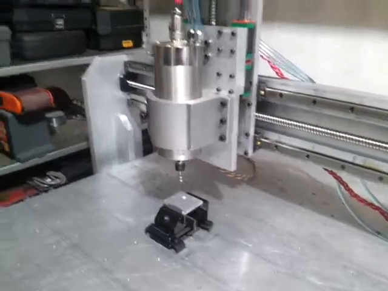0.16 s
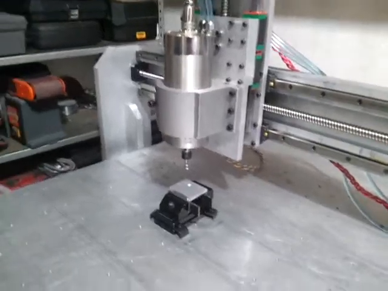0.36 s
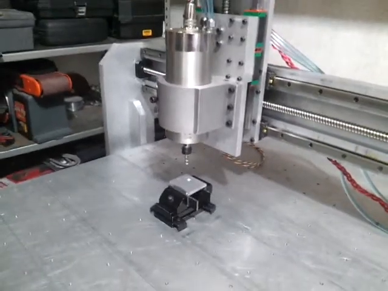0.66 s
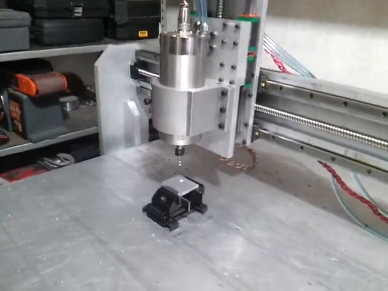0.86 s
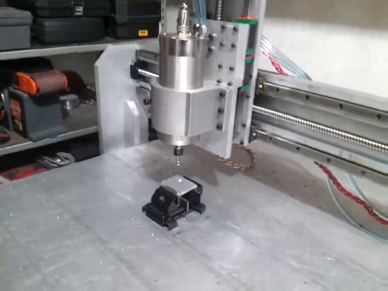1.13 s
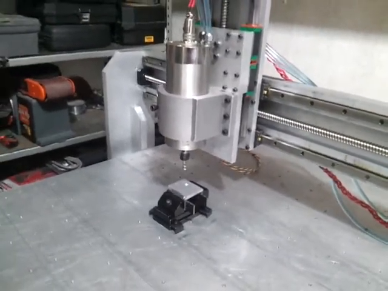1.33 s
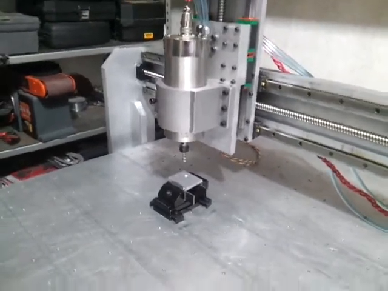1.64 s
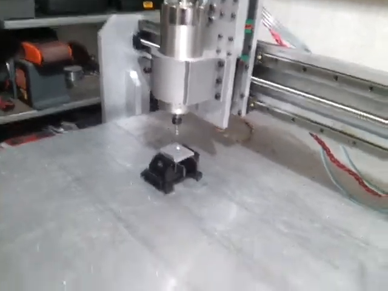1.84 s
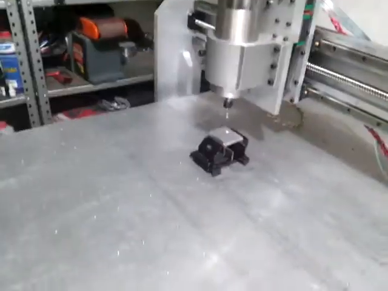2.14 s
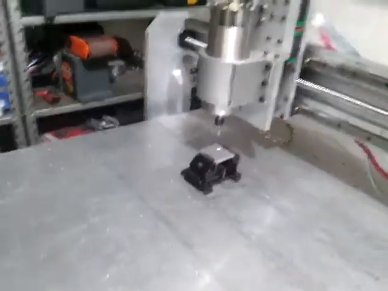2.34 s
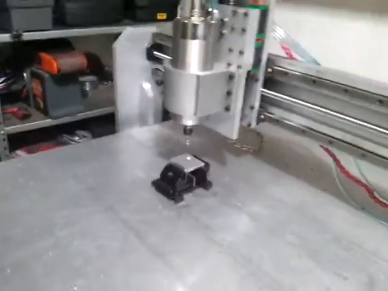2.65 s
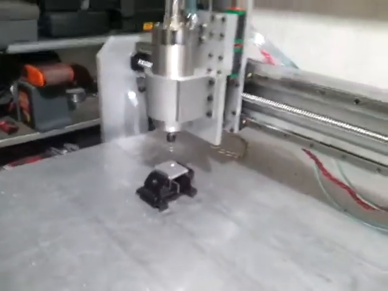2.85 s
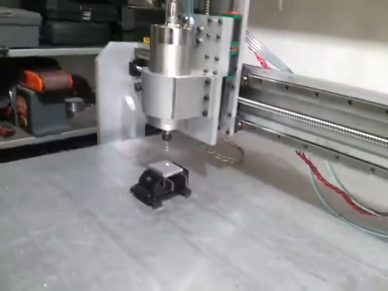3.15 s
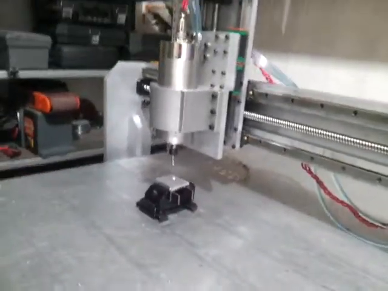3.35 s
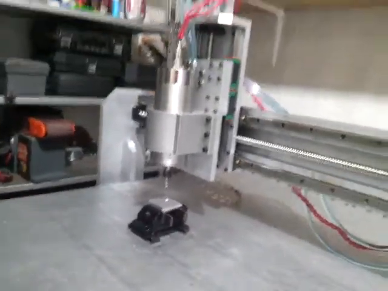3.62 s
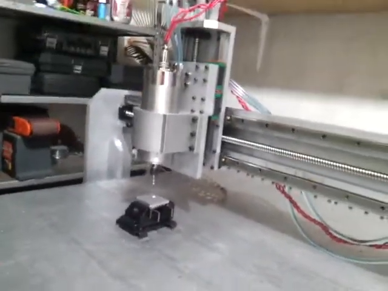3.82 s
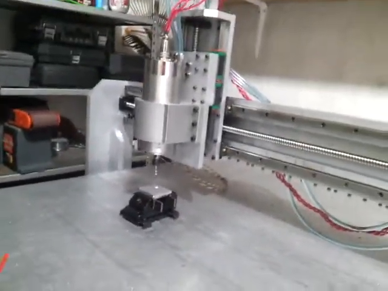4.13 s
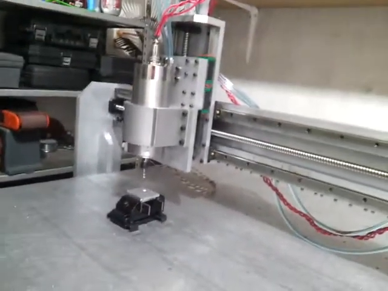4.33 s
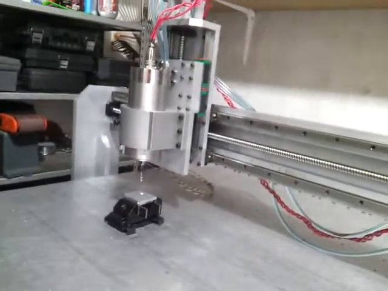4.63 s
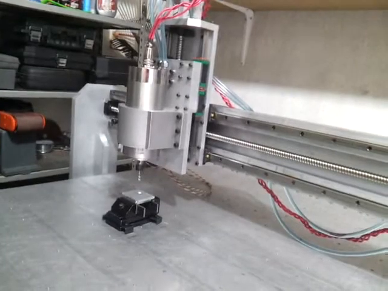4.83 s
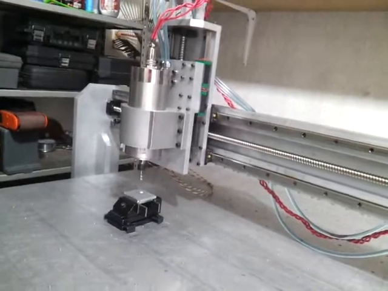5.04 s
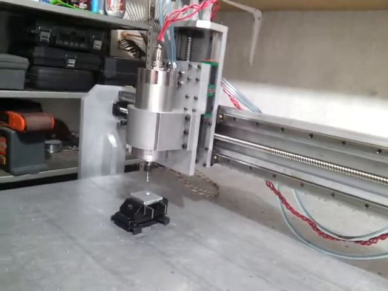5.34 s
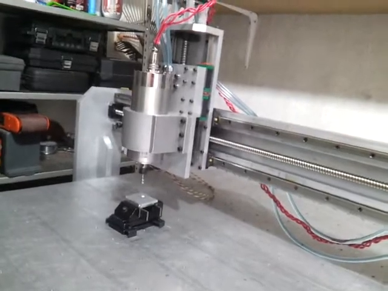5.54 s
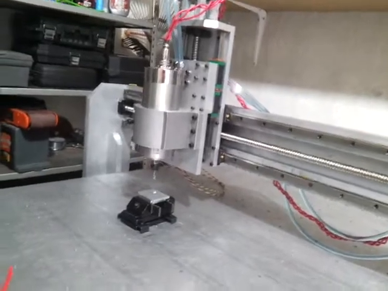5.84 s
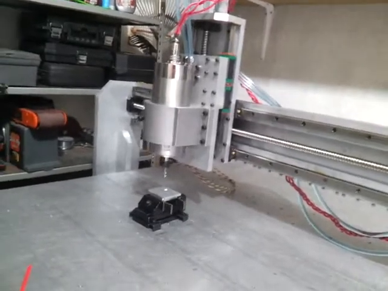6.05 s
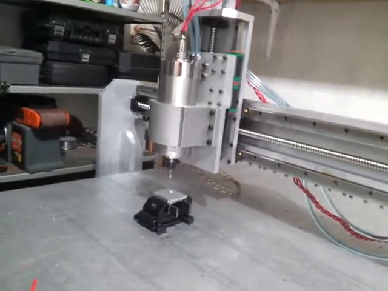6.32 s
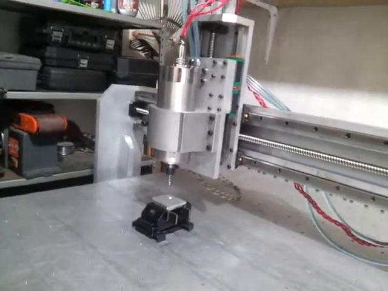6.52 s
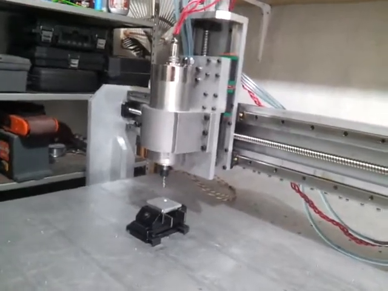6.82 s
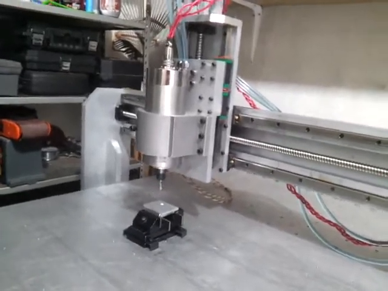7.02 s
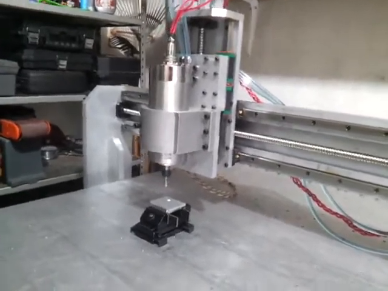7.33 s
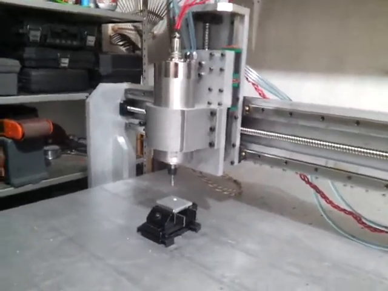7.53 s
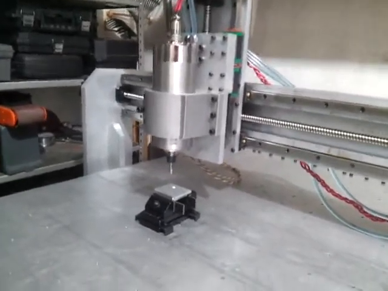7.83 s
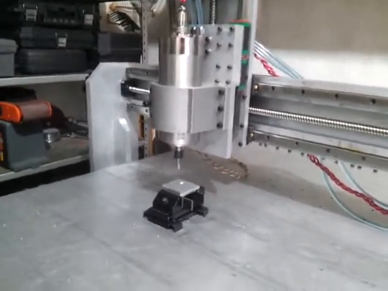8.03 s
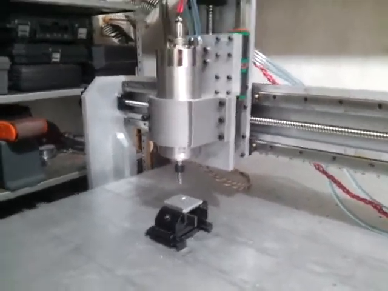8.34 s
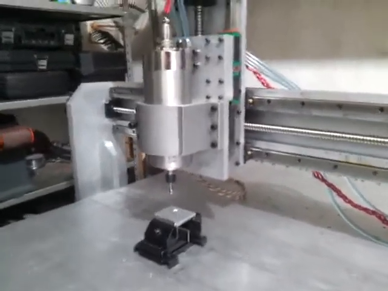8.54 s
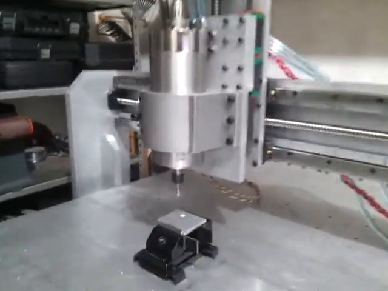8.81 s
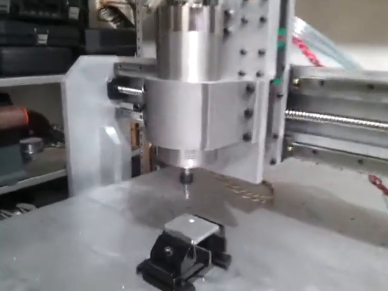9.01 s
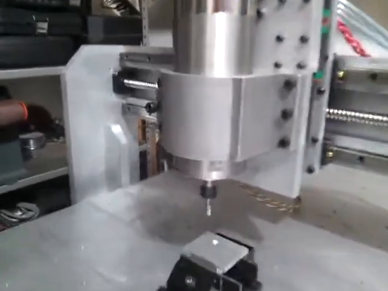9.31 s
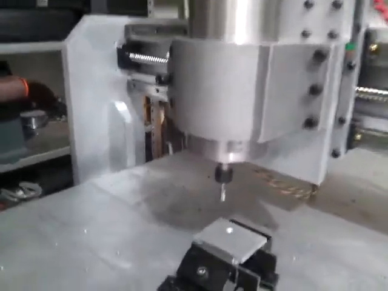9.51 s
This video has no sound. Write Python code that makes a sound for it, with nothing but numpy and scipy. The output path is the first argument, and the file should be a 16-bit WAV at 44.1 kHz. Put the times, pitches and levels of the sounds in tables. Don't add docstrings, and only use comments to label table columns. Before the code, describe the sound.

The sound fades in quickly on a small workshop pump, a steady buzzing drone rich in low and middle harmonics, under broad fan rush and leaking air. Soft handling rumble comes and goes. Near 1.9-2.1 s two small knocks accompany a nozzle opening, and bright hiss swells and stays; a light double tick falls at 3.3 s. At about 5.55 s a rapid cluster of sharp relay clicks starts a router spindle: a faint whine near 5.3 kHz, replaced at 5.9 s by a piercing tone near 8 kHz with a weaker one around 4 kHz, their flutter quickening as it accelerates. An air puff comes at 6.7 s. At 8.2 s the microphone swings away with a small knock; hiss and whine dull. Approaching until the end near 9.7 s, it catches a wavering whine, dull knocks at 9.1 and 9.5 s, handling rumble and a growing rough metallic whirr.

```python
import sys
import numpy as np
from scipy import signal
from scipy.fft import rfft, irfft, next_fast_len
from scipy.io import wavfile
from scipy.ndimage import uniform_filter1d, map_coordinates

SR = 44100
rng = np.random.default_rng(int(sys.argv[2]) if len(sys.argv) > 2 else 0)


def file_out(sig):
    cols = np.atleast_2d(sig).T
    lim = np.clip(cols, -1, 1)
    pcm = np.round(lim * 32767).astype(np.int16)
    wavfile.write(sys.argv[1], SR, pcm)


def natural_amplitude(level_db):
    exponent = np.asarray(level_db, float) / 20
    return 10 ** exponent


N = 426447

PUMP_HZ, SWITCHING_HZ = 34.667, 7996.5
STROKE_TURN = .016
OPEN_S, OPEN_TAKES_S = 1.96, .1
TURN_S, TURN_TAKES_S = 8.19, .1
SWITCH_S = 5.922
ON = slice(round(5.5 * SR), N)
ON_S = np.arange(N)[ON] / SR

# frequency in Hz, density in dB per Hz.
RUMBLE_SPECTRUM = [(8.8, -43), (15, -7), (76, -4), (108, 2), (130, -3), (170, -37), (290, -120)]
# centre in seconds, width in seconds, gain in dB.
RUMBLE_SWELLS = [(.9, 0.52, 6), (1.7, .4, 8), (3.7, 0.22, 3), (4.9, .3, 2), (6.4, .2, 7), (7.25, .25, -12),
                 (8.6, .4, 8), (9.1, .15, 8), (9.6, 0.27, 10)]
# frequency in Hz, density in dB per Hz.
BODY_SPECTRUM = [(65, -48), (110, -15), (158, -12), (199, -10.5), (309, -6), (356, -11.5), (389, -4),
                 (460, -10.5), (612, -7.5), (924, -13), (1490, -16), (2000, -14.5), (2400, -33.5),
                 (3120, -53), (5280, -120)]
# frequency in Hz, density in dB per Hz.
DUCT_SPECTRUM = [(1800, -50), (1930, -12), (1985, 3), (2040, -13), (2180, -25)]
# frequency in Hz, density in dB per Hz.
FAN_SPECTRUM = [(1410, -14), (2400, 0.5), (2720, 1), (3410, -2.5), (4080, -4), (5250, -4.5), (7160, -1.5),
                (8930, -3), (10000, -8.5), (13000, -56), (22000, -120)]
# frequency in Hz, density in dB per Hz.
NOZZLE_SPECTRUM = [(1760, -13.5), (3000, -14), (3350, -8.5), (4470, -6), (5200, -3.5), (6120, -4),
                   (6550, 0), (7710, 2), (8210, -1.5), (9910, -17.5), (10500, -47), (13600, -43),
                   (22000, -120)]
# frequency in Hz, density in dB per Hz.
FIZZ_SPECTRUM = [(5590, -40), (9500, -7.5), (11200, 8), (11800, 6), (12000, -31), (12200, -14),
                 (12400, -75), (16100, -105), (22000, -120)]
# centre in seconds, width in seconds, gain of fan, nozzle and fizz in dB.
PUFFS = [(.5, 0.9, -0.5, -0.5, 1), (.8, .5, -1.5, 1.5, -2), (1.8, 0.3, 1.5, -4.5, -2.5),
         (2.25, 0.15, 1, -2, 2.5), (2.92, .14, 1, 0, 2.5), (3.53, 0.11, 0.5, 0, 3.5), (5.57, .03, 2, 3, 0),
         (6.68, 0.044, 5, 3, 0), (7.5, 0.38, 1, 1, 3), (8.16, .03, -1, 5, -2), (8.25, 0.058, 4, -7, 0),
         (8.47, 0.1, 1.5, -1, 4.5), (9.67, 0.27, -4, 3, 1.5)]
# fan, nozzle in dB.
AIR_SHADE_DB = (-6, -3)
# multiple of the shaft speed, level in dB.
PUMP_ORDERS = [(1, -30), (2, -27), (3, -32.5), (4, -17), (5, -12), (6, -31), (7, -5.5), (8, -17), (9, -0.5),
               (10, -13.5), (11, -7), (12, -16.5), (13, -21), (14, -18), (15, -20.5), (16, -10.5),
               (17, -7.5), (18, -4), (19, -53), (20, -10), (21, -10.5), (22, -21.5), (23, -13.5), (24, -11),
               (25, -25.5)]
# frequency in Hz, level in dB.
RATTLE_LEVELS = [(880, -56), (1200, -52), (1500, -57), (2000, -56.5), (2600, -62.5), (3300, -57.5),
                 (4200, -64.5), (5200, -64)]
# time in seconds, place in m, share of the pump heard directly from 0 to 1.
WALK = [(0, 0.034, 0.12), (3, 0.15, 0.11), (6, 0.41, 0), (7.2, 0.61, 0.24), (7.8, 0.69, 0.34),
        (8.4, 0.72, 0.4), (8.9, 0.85, 0.45), (9.25, 1, 0.3), (9.67, 0.95, 0.03)]
STANDING = [
    (0.28, 1.33, 0.63),
    (0.84, 1.044, 0.3),
    (0.42, 1.14, 0.52),
    (0.78, 1.8, 0.25),
    (-0.13, 1.33, 0.33),
]
# start in seconds, level in dB, pitch in Hz, decay by 60 dB in seconds.
TICKS = [(1.914, -27, 1900, .04), (2.045, -24.5, 1200, 0.04), (3.305, -26, 4670, .03),
         (3.319, -27, 2190, 0.026), (5.547, -25, 7600, 0.016), (5.553, -21, 8400, .03),
         (5.557, -23, 7360, 0.033), (5.561, -24, 7870, .03), (5.566, -27, 8750, .03),
         (5.573, -23, 7740, 0.066), (5.59, -28, 7600, .03), (6.678, -35, 3050, 0.037),
         (8.177, -27, 3000, .04), (9.125, -31, 398, .2), (9.53, -28.5, 397, 0.24)]
# time in seconds, field speed in Hz.
FIELD_SPEED = [(5.6, 2.5), (6.2, 11.65), (6.9, 22.65), (7.1, 25.4), (7.4, 29.15), (7.8, 33.05), (8.2, 36.1),
               (8.7, 39.1), (9.7, 44.45)]
# time in seconds, speed towards the spindle in m per s.
CLOSING = [(6.7, 0), (7.05, -.04), (7.5, 0), (8.15, 0), (8.65, .23), (8.9, .25), (9.3, .13), (9.7, .08)]
# full level in dB, growth with voltage in dB per dB, shade after the swing in dB.
WHINE = [
    (-14.5, 0.44, -10.5),
    (-22.5, 0.18, -3.5),
    (-28, 0.94, -11),
    (-26, 0.96, -5),
]
# centre in seconds, width in seconds, lower and upper in dB.
NULLS = [(6.2, .12, 0.5, -1.5), (6.7, 0.12, -1.5, 2.5), (6.9, .07, -1, 0), (7.4, 0.26, 2, -1),
         (7.47, .08, 0, -8), (7.72, .12, 0.5, 1), (8.18, 0.073, -0.5, -10), (8.3, 0.071, -9, 4),
         (8.5, .12, 1, -9), (8.68, .07, 2, -4), (8.9, 0.065, -4, -4), (9.2, 0.19, -7, 0.5),
         (9.3, 0.038, -4, -2.5)]
# offsets in field orders, then levels in dB.
OUTER_ORDERS = [-10, -7, -4, -3, -2, -1.5, -.5, 0, .5, 2, 4, 8]
OUTER_DB = [-20, -12, -5, -19, -7, -15, -13, -10, -19, -3, -13, -25]
# offsets in field orders, then levels in dB.
HALF_ORDERS = [-9.5, -8.5, -6.5, -5.5, -4.5, -3.5, -2.5, -1.5, -1, -.5, .5, 1, 1.5, 2, 2.5, 3.5, 4, 4.5, 5,
               5.5, 6.5, 8, 9.5, 11]
HALF_DB = [-28, -28, -25, -16, -21, -22, -11, -11, -22, -4, -8, -13, -10, -16, -7, -21, -22, -21, -19, -18,
           -26, -24, -27, -28]
# time in seconds, level in dB.
START_LEVEL = [(5.57, -55), (5.605, -38), (5.71, -33), (5.75, -26.5), (5.9, -26.5)]
# centre in Hz, bandwidth in Hz, level in dB.
HOUSING = [
    (1298, 52, -2),
    (2567, 68, 3.5),
    (4710, 200, -7.5),
]
# centre in seconds, width in seconds, gain in dB.
CATCHES = [(8.67, .06, 3), (8.91, .04, 5), (9.24, 0.052, 4), (9.33, 0.027, 6), (9.41, .03, 3),
           (9.63, .05, 1.5)]


def unit(x):
    return x / np.sqrt(np.mean(x ** 2) + 1e-20)


def along(points, hz):
    f, v = np.transpose(points)
    return np.interp(np.log(hz + 1), np.log(f + 1), v)


def curves(rows):
    s, *cols = np.transpose(rows)
    return [np.interp(np.arange(N) / SR, s, c) for c in cols]


def ramp(start_s, takes_s):
    return np.clip((np.arange(N) / SR - start_s) / takes_s, 0, 1)


def bumps(rows):
    rows, t = np.array(rows), np.arange(0, N + 256, 256) / SR
    sums = rows[:, 2:].T @ np.exp(-((t - rows[:, :1]) / rows[:, 1:2]) ** 2)
    return [np.interp(np.arange(N) / SR, t, v) for v in sums]


def wobble(rate_hz, part=slice(None)):
    knots = rng.standard_normal(int(N * rate_hz / SR) + 4)
    coarse = map_coordinates(knots, [np.arange(0, N + 256, 256) * rate_hz / SR])
    return np.interp(np.arange(N)[part], np.arange(len(coarse)) * 256, coarse).astype(np.float32)


def filtered(x, response):
    m = next_fast_len(N + SR // 2)
    return irfft(rfft(x, m) * response(np.fft.rfftfreq(m, 1 / SR)), m)[:N]


def rush(spectrum, patchy_db):
    z = signal.stft(rng.standard_normal(N + 512), nperseg=512)[2]
    patches = uniform_filter1d(rng.standard_normal(z.shape), 6, 0)
    patches = uniform_filter1d(patches, 14, 1)
    noise = signal.istft(z * natural_amplitude(patchy_db * unit(patches)), nperseg=512)[1][:N]
    return unit(filtered(noise, lambda hz: natural_amplitude(along(spectrum, hz))))


def shaft_turns():
    n = np.arange(N)
    return PUMP_HZ * (n + 1024 * (n > 4.749 * SR)) / SR


def stroke_throb(depth):
    angle = 2 * np.pi * shaft_turns()
    return 1 + depth * (.5 * np.cos(2 * angle) + 1.1 * np.cos(4 * angle))


def handling():
    thumps = natural_amplitude(3.1 * wobble(11)) * rush(RUMBLE_SPECTRUM, patchy_db=2.0)
    return natural_amplitude(-60 + bumps(RUMBLE_SWELLS)[0]) * unit(thumps)


def pump_body_and_duct():
    unsteady_db = 0.59 * wobble(2.945)
    body = natural_amplitude(-34 + unsteady_db) * stroke_throb(0.056) * rush(BODY_SPECTRUM, patchy_db=1.0)
    duct_db = -51.5 + unsteady_db - 6.2 * ramp(TURN_S, TURN_TAKES_S) + 1.6 * wobble(0.61)
    return body + natural_amplitude(duct_db) * rush(DUCT_SPECTRUM, patchy_db=0.0)


def fan():
    level_db = -39 + bumps(PUFFS)[0] + 0.35 * wobble(3.7)
    level_db += 3 * ramp(OPEN_S, OPEN_TAKES_S) + 3 * ramp(6.2, 2.1)
    level_db += AIR_SHADE_DB[0] * ramp(TURN_S, TURN_TAKES_S)
    return natural_amplitude(level_db) * stroke_throb(0.091) * rush(FAN_SPECTRUM, patchy_db=0.4)


def nozzle():
    opened = ramp(OPEN_S, OPEN_TAKES_S)
    missing_db = -2 * np.exp(-np.maximum(np.arange(N) / SR - OPEN_S, 0) / 1.2)
    level_db = -31.5 + bumps(PUFFS)[1] + .5 * wobble(5)
    level_db += -10 * (1 - opened) + missing_db * opened
    level_db += AIR_SHADE_DB[1] * ramp(TURN_S, TURN_TAKES_S)
    return natural_amplitude(level_db) * rush(NOZZLE_SPECTRUM, patchy_db=1.3)


def fizz():
    level_db = -41 + bumps(PUFFS)[2] - 3.5 * ramp(3, 1.4) + 1.2 * wobble(5)
    return natural_amplitude(level_db) * rush(FIZZ_SPECTRUM, patchy_db=1.4)


def pump_orders(angle):
    place_m, direct = curves(WALK)
    best_m, repeat_m, echo = np.transpose(STANDING)[:, :, None]
    standing_wave = np.exp(2j * np.pi * (place_m[::256] - best_m) / repeat_m)
    levels_db = 20 * np.log10(np.abs(1 + np.clip(echo, 0, .9) * standing_wave))
    drift_db = levels_db - np.median(levels_db, axis=1)[:, None]
    smeared = (1 - np.clip(direct, 0, 1)).astype(np.float32)
    unsteady_db = 0.82 + 1.5 * ramp(8.4, .5)[::256]
    out = np.zeros(N)
    for k, db in PUMP_ORDERS[2:]:
        share = np.array([np.interp(k, (5, 9, 11, 18, 21, 24), row[[1, 0, 1, 2, 3, 4]]) for row in np.eye(5)])
        size = natural_amplitude(db - 30.5 + share @ drift_db + unsteady_db * wobble(4, slice(0, N, 256)))
        lag_turn = (.29 * k * k + STROKE_TURN * k + .25) % 1 - .5
        phase = k * angle + np.float32(2 * np.pi * lag_turn) * smeared - np.float32(2 * np.pi * STROKE_TURN * k)
        out += np.interp(np.arange(N) / 256, np.arange(len(size)), size) * np.cos(phase)
    return out


def pump_rattle(angle):
    order, turn = np.arange(26, 140)[:, None], np.linspace(0, 2 * np.pi, 2049)
    fade_db = 1 + 2 * ramp(7.3, .6) - 7 * ramp(TURN_S, 0.26)
    out = np.zeros(N)
    for pattern in range(3):
        size = natural_amplitude(along(RATTLE_LEVELS, order * PUMP_HZ) - 6.5 + 4.26 * rng.standard_normal(order.shape))
        shape = np.sum(size * np.sin(order * turn + 2 * np.pi * rng.random(order.shape)), axis=0)
        out += natural_amplitude(fade_db + 3 * wobble(1.5)) * np.interp(angle, turn, shape)
    return out


def pump():
    angle = (2 * np.pi * ((shaft_turns() + 0.012 * wobble(.6)) % 1)).astype(np.float32)
    return pump_orders(angle) + pump_rattle(angle)


def ticks():
    out, t = np.zeros(N + SR), np.arange(SR // 10) / SR
    for s, db, hz, t60_s in TICKS:
        grit = uniform_filter1d(rng.standard_normal((2, len(t))), int(SR / hz * 1.9) + 1, axis=1)
        grit = uniform_filter1d(grit, int(SR / hz * 2.6) + 1, axis=1)
        burst = unit(grit[0] * np.sin(2 * np.pi * hz * t) + grit[1] * np.cos(2 * np.pi * hz * t))
        envelope = natural_amplitude(db - 60 * t / t60_s) * (1 - np.exp(-t * hz / 1.5))
        out[round(s * SR):][:len(t)] += envelope * burst
    return out[:N]


def whirr(field):
    places = (np.arange(7)[:, None] + .6 * rng.random((7, 1))) / 7
    spots = field + .0015 * wobble(30)[ON] + places
    hits = np.diff(np.floor(spots), prepend=0) * natural_amplitude(1.5 * rng.standard_normal(spots.shape))
    knocks = np.sum(hits, axis=0) * (ON_S > 7)

    def ring(f):
        return sum(natural_amplitude(db) * (1j * f * w / (c * c - f * f + 1j * f * w)) ** 2 for c, w, db in HOUSING)

    rung = filtered(knocks, ring)[:len(ON_S)]
    rung = rung / np.sqrt(np.abs(uniform_filter1d(rung ** 2, size=SR // 8)) + 1e-12)
    level_db = -44 + 5 * (ON_S - 8.4) + 2.5 * wobble(35, ON) + bumps(CATCHES)[0][ON]
    return rung * natural_amplitude(level_db) * np.clip((ON_S - 8.2) / 0.28, .25, 1)


def line(tone, angle, share, k, lag_turn=0):
    return np.sqrt(2) * np.cos(2 * np.pi * (share * tone + k * angle + lag_turn))


def starting_whine(tone, angle):
    def pair(share):
        return line(tone, angle, share, -1) + .72 * line(tone, angle, share, 1, .25)

    after_s = np.maximum(ON_S - SWITCH_S, 0)
    fading = .8 * natural_amplitude(-60 * after_s / .03) + .3 * natural_amplitude(-60 * after_s / .6)
    return fading * natural_amplitude(curves(START_LEVEL)[0][ON]) * (pair(2 / 3) + natural_amplitude(-13) * pair(4 / 3))


def sidebands(tone, angle, field_hz, stir, share, orders, levels_db):
    lagging = np.clip((7.25 - ON_S) / .4, 0, 1).astype(np.float32)
    out = 0
    for k, db in zip(orders, levels_db):
        half = k % 1 == .5
        lag_turn = (k % 4 == 0) / 2 + .2 * (k == 1.5)
        lag_turn += (.05 + .3 * (abs(k) > 3)) * rng.standard_normal()
        skew_turn = .08 - np.sign(k) * (.06 + .2 * lagging) - .1 * lagging
        lag_turn = lag_turn + half * (abs(k) > 2) * skew_turn + .015 * stir ** 2 * wobble(6, ON)
        swell_db = (.8 * stir - .1 + abs(k) / 8) * wobble(9, ON) + (abs(k) in (4, 7)) * (stir - 1)
        swell_db = swell_db - 10 * lagging * (k in (-1.5, 1, 1.5))
        swell_db = swell_db - half * (k < -2) * (field_hz - 28) / 2.5
        swell_db = swell_db - abs(k) * np.maximum(field_hz - 30, -4) / 15
        out = out + natural_amplitude(db + swell_db) * line(tone, angle, share, k, lag_turn)
    return out


def winding_whine(tone, angle, field_hz):
    stir = 1 + 3 * np.clip((ON_S - 8.2) / .15, 0, 1)
    voltage_db = 20 * np.log10(np.minimum(field_hz / 28, 1))
    away = ramp(TURN_S, TURN_TAKES_S)[ON]
    lower_db, upper_db, outer_db, half_db = [db + grows * voltage_db + shade_db * away
                                             for db, grows, shade_db in WHINE]
    lower_null_db, upper_null_db = np.array(bumps(NULLS))[:, ON]
    lower_db = lower_db + lower_null_db + .35 * stir * wobble(12)[ON]
    upper_db = upper_db + upper_null_db + .45 * stir * wobble(12)[ON]
    main = natural_amplitude(lower_db) * line(tone, angle, 1, -1) + natural_amplitude(upper_db) * line(tone, angle, 1, 1)
    haze = main * wobble(70)[ON] * natural_amplitude(-23)
    outer = natural_amplitude(outer_db) * sidebands(tone, angle, field_hz, stir, 1, OUTER_ORDERS, OUTER_DB)
    half = natural_amplitude(half_db) * sidebands(tone, angle, field_hz, stir, .5, HALF_ORDERS, HALF_DB)
    return np.clip((ON_S - SWITCH_S) / .003, 0, 1) * (main + haze + outer + half)


def spindle():
    field_hz = curves(FIELD_SPEED)[0][ON]
    tone_hz = SWITCHING_HZ * (1 + curves(CLOSING)[0][ON] / 343)
    tone = np.cumsum(tone_hz) / SR + 0.1 * wobble(12)[ON]
    field = np.cumsum(field_hz * (ON_S > FIELD_SPEED[0][0])) / SR + .2
    tone, angle = (tone % 6).astype(np.float32), (field % 2).astype(np.float32)
    sound = winding_whine(tone, angle, field_hz) + starting_whine(tone, angle) + whirr(field)
    return np.pad(sound, (ON.start, 0))


def scene():
    air = pump_body_and_duct() + fan() + nozzle() + fizz()
    return np.tile(handling() + air + pump() + ticks() + spindle(), (2, 1))


def low_pass(x):
    return signal.sosfilt(signal.butter(12, 12950, fs=SR, output="sos"), x)


def record(dry):
    faded = dry[0] * (.04 + .96 * ramp(0, .25))
    mono = filtered(faded, lambda hz: (hz < 12050) * hz / np.hypot(hz, 30))
    bursts = mono * np.maximum(wobble(40) - 1.2, 0)
    flecks = natural_amplitude(-19) * filtered(bursts, lambda hz: (hz > 3800) & (hz < 10500))
    return low_pass(np.array([mono + flecks, mono - flecks]))


dry = scene()
out = record(dry)
file_out(out)
```